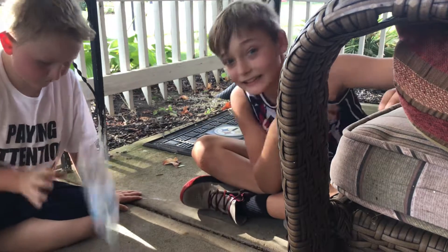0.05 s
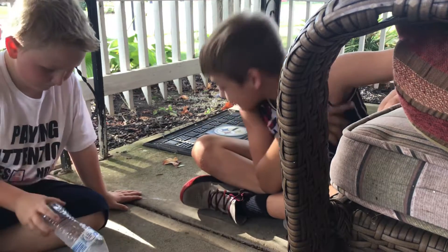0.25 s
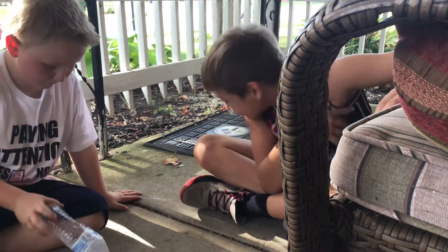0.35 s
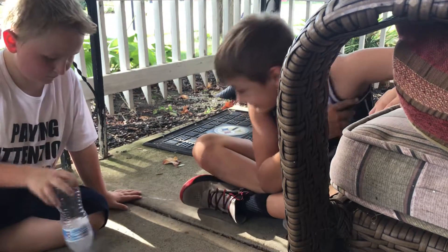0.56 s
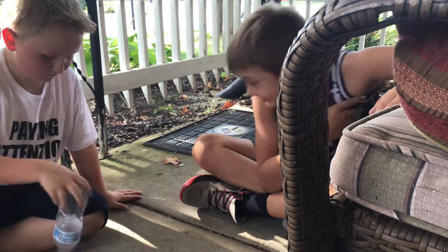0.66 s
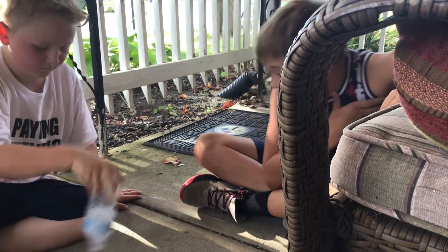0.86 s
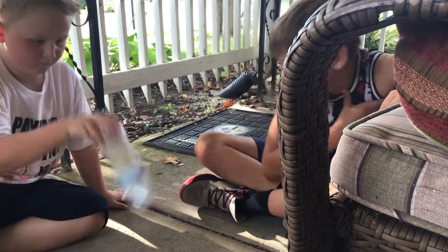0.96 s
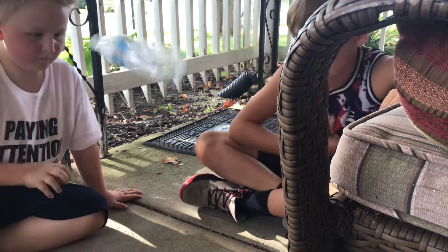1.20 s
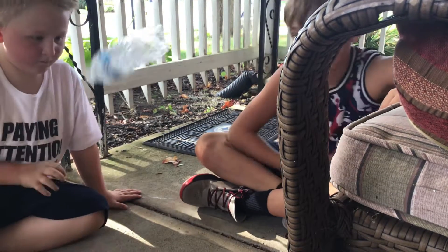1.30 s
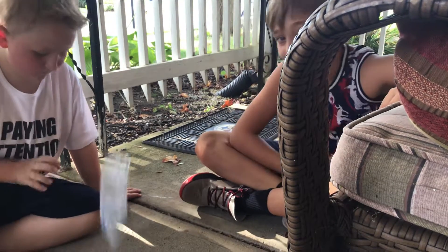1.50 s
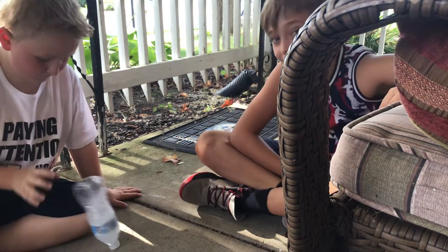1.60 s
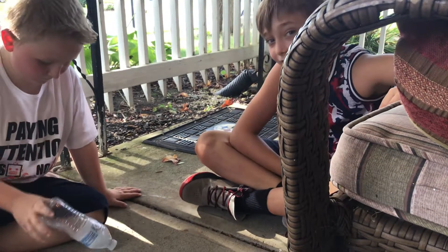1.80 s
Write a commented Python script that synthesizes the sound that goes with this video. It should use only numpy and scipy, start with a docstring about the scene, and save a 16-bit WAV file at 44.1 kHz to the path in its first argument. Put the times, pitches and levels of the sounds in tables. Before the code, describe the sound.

Plastic water bottle smacks a porch floor, is handled and scraped, then smacks down again

```python
"""Plastic bottle landing on concrete

A partly filled plastic bottle lands twice on a porch floor: damped modes (the body), noise bursts (the
buckling wall and settling water) and resonated noise (the boom). Handling adds filtered taps and crinkles;
between the landings the base scrapes the concrete as gritty, resonated noise. Rustles are swells of band noise.
Hiss and rumble are shaped noise, a far motor is a few wavering harmonics; taps, crinkles and scrape get a tail."""
import sys
import numpy as np
from scipy import signal
from scipy.fft import rfft, irfft, next_fast_len
from scipy.io import wavfile
from scipy.ndimage import map_coordinates

SR = 44100
rng = np.random.default_rng(int(sys.argv[2]) if len(sys.argv) > 2 else 0)


def to_wav(s):
    """Save 16-bit WAV."""
    ch = np.atleast_2d(s).T  # columns
    pcm = np.round(np.clip(ch, -1, 1) * 32767)  # PCM
    wavfile.write(sys.argv[1], SR, pcm.astype(np.int16))


N = 81585
T = np.arange(N) / SR  # time, s


def amp(db):
    """Decibel law: level in dB to amplitude gain."""
    return 10 ** (np.asarray(db) / 20)


def unit(x):
    """Normalisation to an rms of 1."""
    return x / np.sqrt(np.mean(x ** 2) + 1e-20)


def filtered(x, response):
    """Linear filtering: the spectrum of x times a response of frequency."""
    m = next_fast_len(len(x) + SR // 4)
    hz = np.fft.rfftfreq(m, 1 / SR) + 1  # the offset of 1 Hz avoids log(0)
    return irfft(rfft(x, m) * response(hz), m)[:len(x)]


def white():
    """White noise: equal mean power at every frequency."""
    return rng.standard_normal(N)


def resonated(response, source=None):
    """Source-filter principle: noise through a response, at rms 1."""
    return unit(filtered(white() if source is None else source, response))


def coloured(points, source=None):
    """Spectral shaping: noise of rms 1 under a curve of (f/Hz, level/dB) points on a log axis."""
    f, level = np.transpose(points)
    return resonated(lambda hz: amp(np.interp(np.log(hz), np.log(f), level)), source)


def band(f, hz, octaves):
    """Constant relative bandwidth: a bell around hz on a log axis."""
    return np.exp(-.5 * (np.log2(f / hz) / octaves) ** 2)


def wobble(rate):
    """Slow random modulation: a smooth curve with rate knots a second."""
    knots = rng.standard_normal(int(N * rate / SR) + 4)
    return map_coordinates(knots, [T * rate])


def shape(s, rise, hold, t60):
    """Exponential decay: linear rise from time s, hold, then 60 dB of fall in t60 seconds."""
    u = T - s
    return np.clip(u / rise, 0, 1) * amp(-60 * np.clip(u - rise - hold, 0, None) / t60)


GRIT_PER_S, GRIT_DB = 4000, 2.5  # mean click rate; spread of click level, dB


def grit():
    """Shot noise: dense random clicks of uneven size."""
    clicks = rng.random(N) < GRIT_PER_S / SR
    return clicks * amp(GRIT_DB * rng.standard_normal(N)) * rng.standard_normal(N)


# Bottle landings: [t/s, body level/dB, body pitch factor, crunch level/dB, crunch hold/s,
# boom level/dB, wall ping f/Hz]
BLOWS = [(0.2045, -9.5, 0.96, -12.5, 0.0048, -33.5, 3520), (1.6255, -9, 0.96, -12.5, 0.0053, -40.5, 4810)]
BODY_SHARP = 5  # extra pitch factor at the instant of a landing


def landings():
    """Superposition: every blow sums body modes, wall crunch and ping, splash and boom."""
    out = np.zeros(N)
    for s, body_db, pitch, crunch_db, hold, boom_db, ping_hz in BLOWS:
        out += amp(body_db) * ring(s, pitch, BODY_SHARP, 1, lambda f, level: 1)
        out += amp(crunch_db) * (crunch(s, hold) + wall_ping(s, ping_hz) + splash(s))
        out += amp(boom_db) * boom(s)
    return out


# Modes of the bottle before pitch and damping factors: [f/Hz, level/dB, t60/s]
BODY_MODES = [(88.5, -7.5, 0.12), (182.4, -3, 0.094), (254.8, 3.5, 0.098), (282, -3, 0.025),
              (322, -4.5, 0.135), (429, -1.5, 0.037), (618, -9, 0.086), (766, -16.5, 0.055),
              (1010, -26, 0.033), (1360, -25, 0.088), (1557, -1.5, 0.017)]
SINK_S, GLIDING_HZ = 0.001507, 380  # time constant of the pitch fall; it acts on modes below this
LATE_HZ, LATE_CYCLES = 200, 1.3  # modes below this build up over some cycles and do not glide
ATTACK_S, MODE_SCATTER_DB = 0.00075, .8  # rise of the other modes; random spread of level


def ring(s, pitch, sharp, damp, weight):
    """Modal synthesis: damped sines from time s; the squeezed body starts sharp and sinks."""
    u = np.clip(T - s, 0, None)
    ahead = sharp * SINK_S * (1 - np.exp(-u / SINK_S))  # integral of the extra pitch
    out = np.zeros(N)
    for hz, db, t60 in BODY_MODES:
        late = hz < LATE_HZ
        if late:
            rise = (1 - np.exp(-u * hz / LATE_CYCLES)) ** 2
        else:
            rise = 1 - np.exp(-u / ATTACK_S)
        level = db + rng.normal(0, MODE_SCATTER_DB) - 60 * u / (damp * t60)
        glides = hz < GLIDING_HZ and not late
        phase = 2 * np.pi * hz * pitch * (u + ahead * glides)
        out -= rise * amp(level) * weight(hz, db) * np.sin(phase)
    return out


# Spectrum of the buckling wall: [f/Hz, relative level/dB per Hz]
CRUNCH_SPECTRUM = [(290, -8.5), (600, -9), (1100, -19.5), (1600, -7.5), (2400, -19.5), (4500, -23),
                   (7300, -28), (8200, -14.5), (9700, -13.5), (11500, -16.5), (15100, -24), (16000, -34)]


def crunch(s, hold):
    """Broadband impact noise: the thin wall buckles."""
    return shape(s, 0.00039, hold, t60=0.025) * coloured(CRUNCH_SPECTRUM)


PING_DB, PING_DELAY_S, PING_OCTAVES = -11.5, 0.0027, 0.042  # level against the crunch


def wall_ping(s, hz):
    """Local resonance: the spot of wall that hits pings as narrow-band noise."""
    envelope = shape(s + PING_DELAY_S, 0.0022, 0.0034, t60=0.024)
    return amp(PING_DB) * envelope * resonated(lambda f: band(f, hz, PING_OCTAVES))


# Spectrum of the settling water: [f/Hz, relative level/dB per Hz]
SPLASH_SPECTRUM = [(240, -33), (500, -5), (1500, -5.5), (3500, -7.5), (4900, -4.5), (6300, -12.5),
                   (7600, -16.5), (8300, -3), (10000, -8), (12000, -17.5), (16000, -26)]
SPLASH_DB = -11.5  # against the crunch


def splash(s):
    """Turbulent noise with clicks: the water settles after the blow, under the crunch."""
    source = white() + 0.41 * unit(grit())
    return amp(SPLASH_DB) * shape(s, 0.0019, 0.012, t60=.2) * coloured(SPLASH_SPECTRUM, source)


# Resonances of the porch boom: [f/Hz, width/Hz, level/dB]
BOOM_MODES = [(262, 28, 8), (335, 47, -2.5), (398, 57, -19.5)]


def boom(s):
    """Room resonance: noise through the second-order resonators of the porch."""
    def response(f):
        return sum(amp(db) * w * f / np.sqrt((c * c - f * f) ** 2 + (f * w) ** 2) for c, w, db in BOOM_MODES)
    return shape(s, 0.022, 0.069, t60=0.19) * resonated(response)


# The base drags over concrete: spectrum of the drag [f/Hz, relative level/dB per Hz]
SCRAPE_SPECTRUM = [(240, -20), (500, -13.5), (1200, -15), (2000, -10.5), (3000, -9), (6200, -8.5),
                   (7600, -14), (8400, 0), (10000, -2.5), (12000, -11.5), (16000, -16)]
# Resonances of the bottle's base: [f/Hz, width/Hz, level/dB]
BASE_RINGS = [(2740, 83, -2), (3430, 83, 2), (4540, 160, 11.5), (5320, 300, 14.5), (7170, 380, 8.5)]
SCRAPE_S, SCRAPE_DB, SCRAPE_RISE_S, SCRAPE_HOLD_S = 0.5971, -29, .016, 0.016
AFTER_DB, SING_DB = -21.5, -4.5  # slow fade-out and singing base, both against the drag


def scrape():
    """Friction excitation: gritty noise drives the base, which sings most at the start."""
    def base(f):
        return sum(amp(db) / (1 + (2 * (f - c) / w) ** 2) for c, w, db in BASE_RINGS)
    source = white() + 0.88 * unit(grit())
    stroke = shape(SCRAPE_S, SCRAPE_RISE_S, SCRAPE_HOLD_S, t60=0.21)
    stroke += amp(AFTER_DB) * shape(SCRAPE_S, 0.025, 0.026, t60=0.65)
    sing = amp(SING_DB) * shape(SCRAPE_S, SCRAPE_RISE_S, SCRAPE_HOLD_S, t60=0.11)
    drag = stroke * coloured(SCRAPE_SPECTRUM, source) + sing * resonated(base, source)
    return amp(SCRAPE_DB + 0.59 * wobble(150)) * drag


# Finger taps on the bottle: [t/s, level/dB, favoured f/Hz]
FINGER_TAPS = [(0.382, -40.5, 336), (0.384, -37.5, 1020), (.448, -38, 477), (.491, -34, 766),
               (.527, -34.5, 244), (0.535, -37, 398), (.547, -35.5, 574), (1.114, -41, 620),
               (1.152, -42, 756), (1.16, -42.5, 340), (1.295, -44.5, 910), (1.816, -39, 275),
               (1.828, -38.5, 326), (1.84, -38.5, 610)]
TAP_DAMP, TAP_OCTAVES = .6, .3  # factor on the mode t60; width of the favoured band
PUFF_DB = -15.5  # noise puff against the tap


def taps():
    """Selective modal excitation: each tap favours the modes near one frequency, with a noise puff."""
    out = np.zeros(N)
    for s, db, hz in FINGER_TAPS:
        def favour(f, level):
            return band(f, hz, TAP_OCTAVES) * amp(-level)  # cancels the mode's own level
        out += amp(db) * ring(s, rng.normal(1, 0.029), 0, TAP_DAMP, favour)
        puff = resonated(lambda f: band(f, 1.54 * hz, 0.75))
        out += amp(db + PUFF_DB) * shape(s, 0.0013, 0.0023, t60=.04) * puff
    return out


# Crinkles of the wall: [t/s, level/dB, centre f/Hz]
WALL_CRINKLES = [(0.348, -46, 8050), (.383, -44, 3360), (1.011, -52, 1500), (1.086, -50, 1850),
                 (1.117, -43.5, 2020), (1.145, -39, 8500), (1.149, -47, 2940), (1.196, -51.5, 3820),
                 (1.311, -43.5, 10800), (1.316, -54, 10900), (1.401, -50, 10500), (1.737, -51, 9500)]


def crinkles():
    """Snap buckling: fingers crinkle the wall in short bursts of band noise."""
    out = np.zeros(N)
    for s, db, hz in WALL_CRINKLES:
        noise = resonated(lambda f: band(f, hz, octaves=0.51))
        out += amp(db) * shape(s, 0.00028, 0.00088, t60=0.018) * noise
    return out


# Soft rustles: [centre t/s, half length/s, level/dB, centre f/Hz, width/octaves]
SOFT_RUSTLES = [(1.046, 0.12, -54.5, 2210, 0.47), (1.06, 0.13, -57, 566, 0.71),
                (1.27, 0.01, -55, 11000, .4), (1.307, 0.019, -53.5, 2480, .8), (1.5, 0.021, -54, 5000, .4),
                (1.503, 0.03, -48.5, 9300, 0.28), (1.544, 0.029, -51.5, 10800, 0.49)]


def rustles():
    """Amplitude-modulated noise: soft Gaussian swells of cloth and sloshing water."""
    out = np.zeros(N)
    for s, half, db, hz, octaves in SOFT_RUSTLES:
        source = white() + .5 * unit(grit())
        noise = resonated(lambda f: band(f, hz, octaves), source)
        out += amp(db + 0.56 * wobble(40.5)) * np.exp(-((T - s) / half) ** 2) * noise
    return out


PORCH_DB, PORCH_T60 = -13.5, 0.27


def porch(x):
    """Diffuse reverberation: convolution with a short decaying noise tail."""
    t = T[:SR // 3]
    tail = rng.standard_normal(len(t)) * amp(-60 * t / PORCH_T60) * (t > .005)
    return signal.fftconvolve(x, tail / np.linalg.norm(tail))[:N]


# Spectrum of the outdoor hiss: [f/Hz, relative level/dB per Hz]
AIR_SPECTRUM = [(150, 0), (250, 1), (500, -6), (1000, -11.5), (2000, -10.5), (4500, -10), (5500, -11),
                (6500, -15), (7700, -17), (8200, -7), (9500, -10), (11000, -18.5), (12500, -22),
                (16000, -30)]
AIR_DB = -52


def hiss():
    """Stationary noise: a nearly steady outdoor hiss."""
    return amp(AIR_DB + 0.53 * wobble(6.4)) * coloured(AIR_SPECTRUM)


# Spectrum of the far rumble: [f/Hz, relative level/dB per Hz]
RUMBLE_SPECTRUM = [(18, -70), (35, -55), (60, 0.5), (90, 0.5), (120, -1.5), (180, -10), (260, -15),
                   (400, -35), (880, -120)]
# Course of the rumble: [t/s, level/dB]
RUMBLE_COURSE = [(0.0, -58.5), (0.304, -51.5), (0.906, -58.5), (1.066, -54.5), (1.168, -54), (1.556, -52.5),
                 (1.85, -47)]


def rumble():
    """Low-frequency noise: a far rumble of uneven level."""
    s, db = np.transpose(RUMBLE_COURSE)
    return amp(np.interp(T, s, db) + 1.3 * wobble(12.7)) * coloured(RUMBLE_SPECTRUM)


# Harmonics of a far motor: [multiple of the turning rate, level/dB]
MOTOR_LINES = [(2, -56), (3, -63.5), (4, -66)]
MOTOR_HZ = 53.8  # mean turning rate


def motor():
    """Harmonic series: a few low lines, wavering in pitch together and in level apart."""
    turn = 2 * np.pi * np.cumsum(MOTOR_HZ * (1 + 0.0102 * wobble(4.2))) / SR
    return sum(amp(db + 3.9 * wobble(6.24)) * np.sin(k * turn) for k, db in MOTOR_LINES)


def scene():
    """Superposition: near sounds, the tail of the small ones, and the background."""
    small = taps() + crinkles() + scrape()
    near = landings() + small + amp(PORCH_DB) * porch(small) + rustles()
    return (near + hiss() + rumble() + motor())[None]


LOW_HZ, CLIP, TOP_HZ = 60, .93, 15800  # high-pass corner, soft ceiling (full scale 1), band limit


def record(dry):
    """Band limiting and saturation: the microphone drops deep bass, peaks round off, the top is cut."""
    x = signal.sosfilt(signal.butter(2, LOW_HZ, "high", fs=SR, output="sos"), dry[0])
    soft = x / (1 + np.abs(x / CLIP) ** 4) ** (1 / 4)
    return filtered(soft, lambda hz: hz < TOP_HZ)[None]


dry = scene()
out = record(dry)
to_wav(out)
```